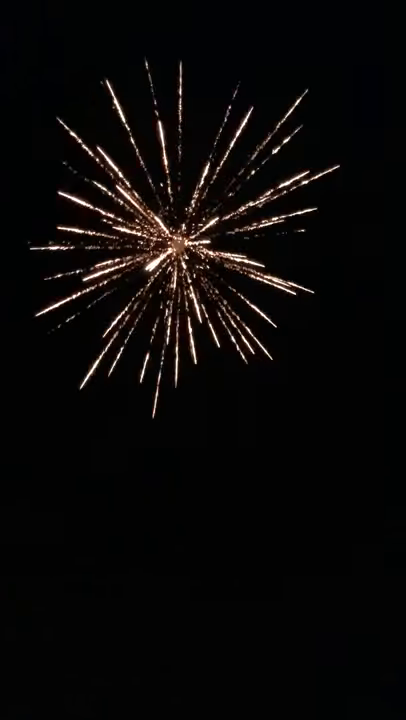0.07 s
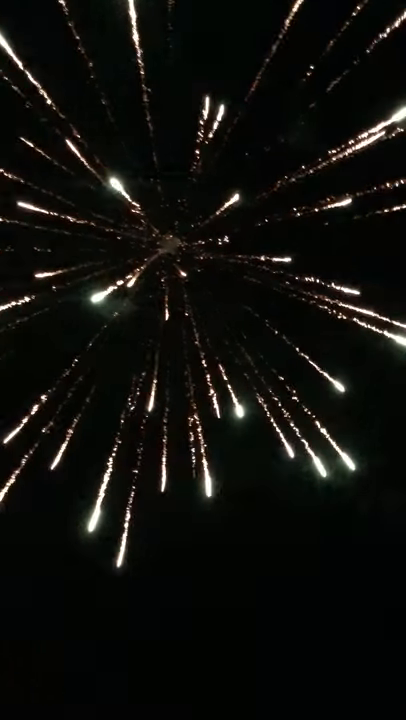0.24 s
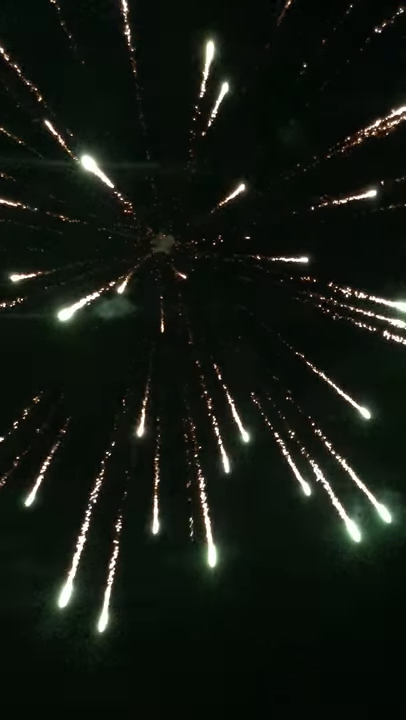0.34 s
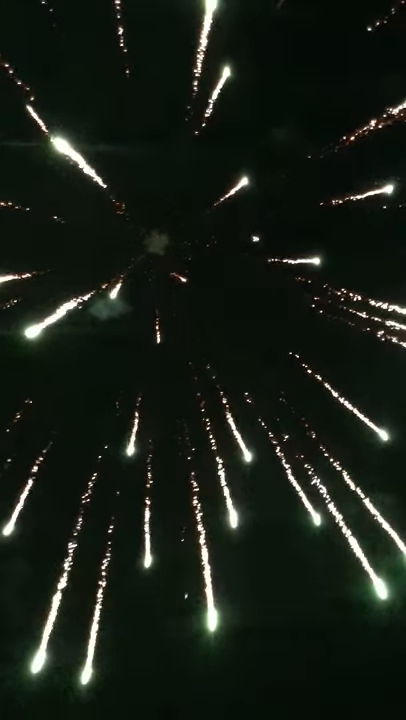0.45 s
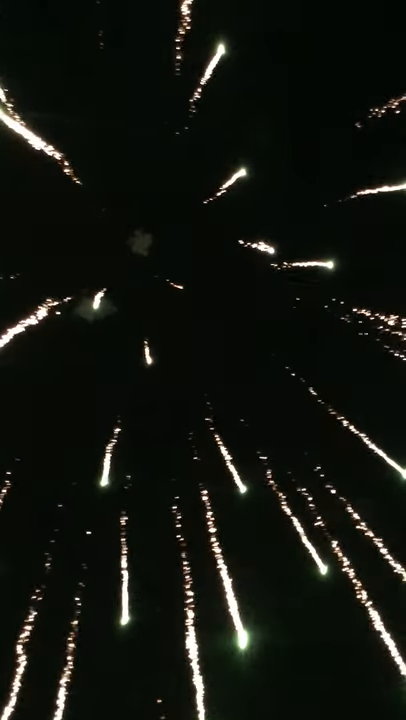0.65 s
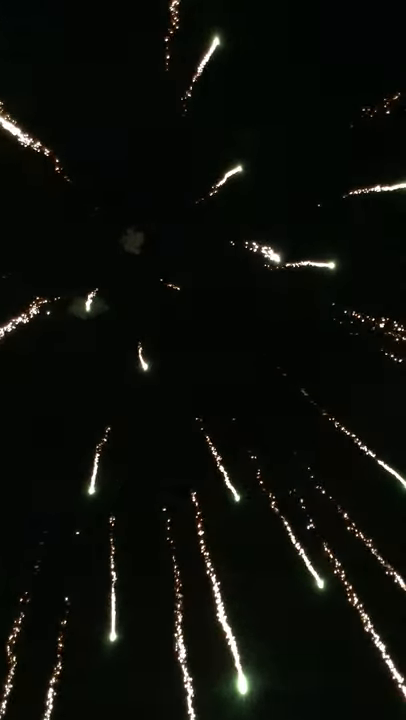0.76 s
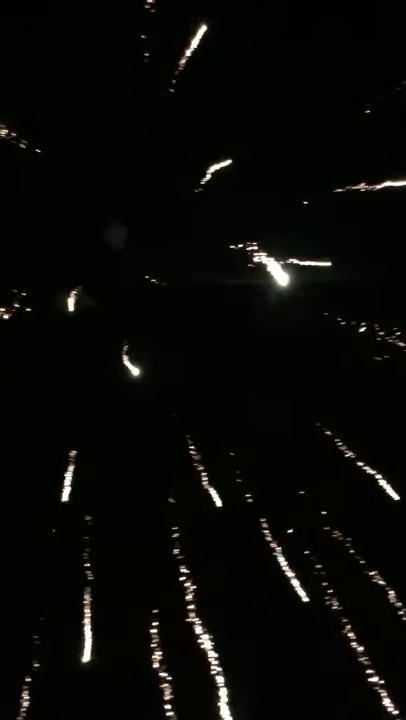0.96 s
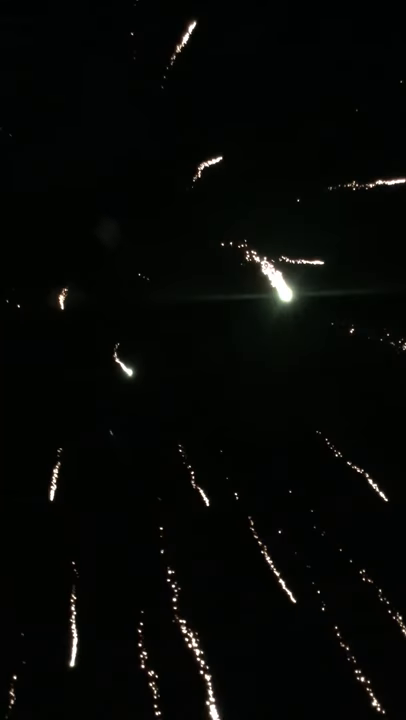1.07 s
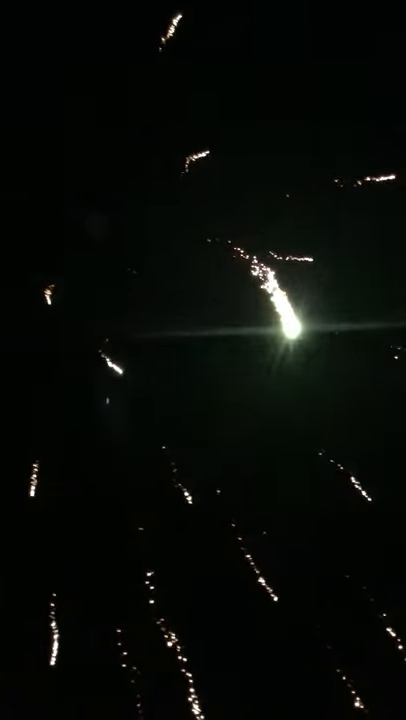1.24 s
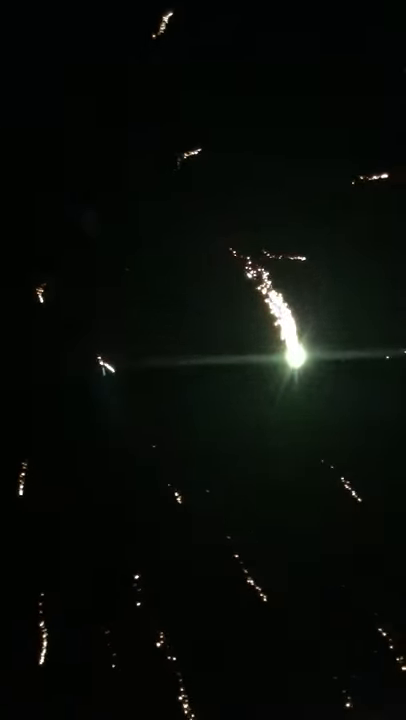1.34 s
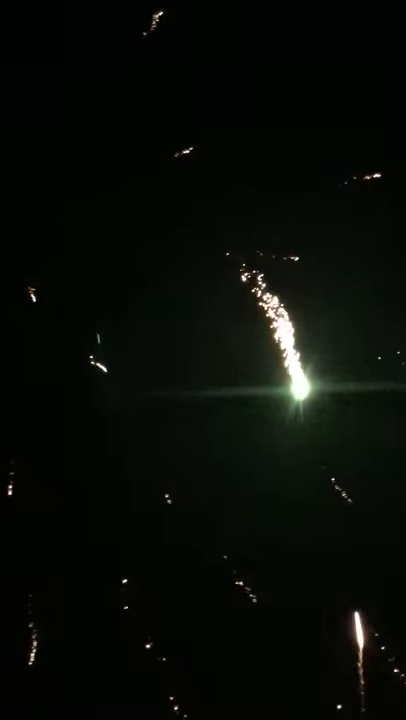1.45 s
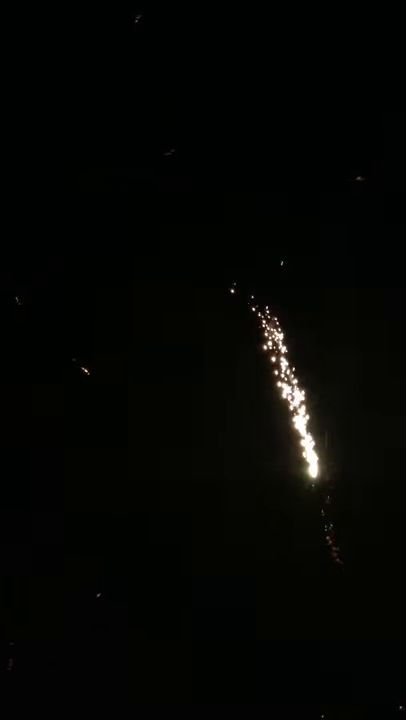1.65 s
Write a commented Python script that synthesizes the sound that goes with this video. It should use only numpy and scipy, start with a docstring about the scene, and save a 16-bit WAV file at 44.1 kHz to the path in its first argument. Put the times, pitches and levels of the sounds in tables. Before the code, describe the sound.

Quiet outdoor night hush with faint distant pops, then a close, overloading firework explosion, its rumble echoing off walls and slopes, followed by a shorter booming bang and a dry snap, heard at a single microphone.

```python
"""A firework shell bursts overhead: a shock front, a dense roar off the ground and nearby walls, then a long
rolling rumble. A second later come a booming report and a thin, sharp crack, each with its own slap echoes.
Faint pops sound far away in a low outdoor hush, all heard at one microphone. Fronts are shaped pulses, booms
are decaying sines, roars and tails are fading noise; a fast limiter holds down the loudest peaks."""
import sys
import numpy as np
from scipy import signal
from scipy.fft import rfft, irfft, next_fast_len
from scipy.io import wavfile
from scipy.ndimage import uniform_filter1d, minimum_filter1d, map_coordinates

SR = 44100
rng = np.random.default_rng(int(sys.argv[2]) if len(sys.argv) > 2 else 0)


def to_wav(s):
    """Save 16-bit WAV."""
    ch = np.atleast_2d(s).T  # columns
    pcm = np.round(np.clip(ch, -1, 1) * 32767)  # PCM
    wavfile.write(sys.argv[1], SR, pcm.astype(np.int16))


N = 74970  # samples

# Levels are dB re full scale ahead of the limiter; colours give only the shape of a spectrum.
# Spectrum of the outdoor hush [pitch_hz, relative_level_db]
NIGHT_COLOUR = [(25, -28), (70, -6), (120, 2.5), (260, -0.5), (400, -8), (700, -11), (1000, -23),
                (2700, -30), (5000, -39), (15500, -48)]
NIGHT_DB = -51.5  # rms about which the hush wavers
# Far pops [start_s, peak_db, pitch_hz, half_width_octaves]
FAR_POPS = [(.079, -37.5, 245, 0.38), (0.164, -47, 2500, 0.87)]

BURST_S = 0.2162  # the shell's shock front reaches the microphone
# The shell's shock and its near reflections [delay_s, peak_db]
BURST_SHOCKS = [(0, 2), (.0012, -25), (.0042, 1), (.015, -3), (.031, -2), (0.0337, 3.5)]
# Spectrum of the shock and its tearing edge [pitch_hz, relative_level_db]
BURST_COLOUR = [(40, -1.5), (300, 1), (1400, -4), (2500, -18.5), (6000, -18.5), (9000, -24), (15500, -22.5)]
# The shell's low push, before its attack [pitch_hz, start_level_db, t60_s]
BURST_BOOM = [(62, -3.5, .11), (87.9, 4.5, 0.12), (125.2, -1, .1), (243.4, -7, 0.225)]
# Spectrum of the roar off the ground and nearby walls [pitch_hz, relative_level_db]
ROAR_COLOUR = [(15, -41), (25, -12), (86, 0.5), (188, -3.5), (253, -0.5), (495, -3.5), (567, -9),
               (762, -13), (1710, -21), (1900, -17.5), (3630, -25), (5430, -27.5), (15500, -47)]
# Decay of the roar [pitch_hz, t60_s]
ROAR_T60 = [(110, 0.098), (300, 0.39), (1000, 0.25), (4000, 0.25), (12000, 0.28)]
# Dull single echoes of the shell [delay_s, peak_db]
THUDS = [(0.061, -2.5), (0.07, -6.5), (.126, -7.5), (.137, -11)]
# Spectrum of those echoes [pitch_hz, relative_level_db]
THUD_COLOUR = [(30, -24), (80, -9.5), (250, 8), (400, -4.5), (800, -18), (3000, -49), (15000, -80)]

# Spectrum of the long rumble [pitch_hz, relative_level_db]
ROLL_COLOUR = [(15, -53), (25, -69), (64, -7), (164, -4), (221, -2.5), (260, -1.5), (368, -5.5), (445, -6),
               (848, -16.5), (1490, -19), (1660, -20), (2300, -20.5), (4260, -27.5), (15500, -62.5)]
# Decay of the rumble, shared by the report's roll [pitch_hz, t60_s]
ROLL_T60 = [(60, 5.3), (140, 3.4), (300, 5.04), (1500, 3.36), (4000, 2.35), (8000, 1.49), (14000, 0.77)]
# Swells of the rumble, returned by far slopes and buildings [delay_s, width_s, gain_db]
SWELLS = [(.19, 0.041, 2), (.3, 0.063, 1), (.56, 0.082, 2)]
CRACKLE_RATE, CRACKLE_DB = 900, 0.44  # graininess of the tails: random knots per second, depth in dB

# Ragged echoes off walls, trees and slopes
# [start_s (centre), relative_level_db, pitch_hz, half_width_octaves, length_s (centre to 1/e)]
SLAPS = [(0.3387, -18.5, 4000, 0.22, 0.0051), (.377, -20, 4300, 0.12, 0.008),
         (0.629, -20.5, 75, 0.36, 0.019), (0.79, -18, 350, .8, 0.016), (1.285, -10, 250, 0.68, 0.0038),
         (1.316, -7.5, 300, 0.78, 0.0058), (1.314, -27, 2200, 1.1, .004), (1.36, -16.5, 1350, 0.96, 0.0062),
         (1.464, -24, 2800, 0.82, 0.0017), (1.553, -36, 3750, 0.29, 0.022)]
# Sharp echoes off hard walls [start_s, peak_db, pitch_hz, half_width_octaves]
TICKS = [(1.2793, -10.5, 3200, 0.51), (1.2849, -9, 4230, 0.31), (1.4152, -17, 1390, 0.65)]

REPORT_S = 1.2465  # the second, booming report
REPORT_SHOCK_DB = 0  # peak of its shock front
# Spectrum of the report's front [pitch_hz, relative_level_db]
REPORT_COLOUR = [(100, -10), (450, -1), (750, -7), (1250, 4), (1900, -4), (3000, -3), (3700, -6.5),
                 (4700, -2), (6800, -10), (8200, -27), (11000, -37), (15500, -42)]
# The report's low push, before its attack [pitch_hz, start_level_db, t60_s]
REPORT_BOOM = [(73.6, -5.5, 0.092), (187.7, 6.5, 0.057), (304, 3.5, 0.052), (474, -1, 0.033)]
# Spectrum of the report's short tail [pitch_hz, relative_level_db]
REPORT_TAIL_COLOUR = [(15, -55), (25, -29), (53, -9.5), (173, -8), (289, -2), (349, -6), (482, -9.5),
                      (945, -19), (1170, -16.5), (4380, -25.5), (15500, -56.5)]
# Decay of that tail [pitch_hz, t60_s]
REPORT_TAIL_T60 = [(60, 0.85), (300, 0.47), (1500, 0.37), (4000, 0.32), (12000, 0.28)]
# Spectrum of the report's weaker roll [pitch_hz, relative_level_db]
REPORT_ROLL_COLOUR = [(25, -35), (75, -0.5), (250, -1), (500, -11.5), (1200, -12), (4000, -21), (8000, -42),
                      (15500, -70)]

# Thin cracks; the level scales every part of a crack [start_s, level_db]
CRACKS = [(1.3992, -0.5), (1.6488, -21)]
# Spectrum of a crack [pitch_hz, relative_level_db]
CRACK_COLOUR = [(60, -19.5), (200, -2.5), (750, -10), (1500, 2.5), (2000, -3), (2400, -11.5), (3100, -9),
                (3700, -22), (4400, -9), (5500, -40), (6900, -23), (8000, -41), (15500, -61)]
# A crack's direct front and near reflections [delay_s, relative_level_db]
CRACK_WALLS = [(0, 2), (.0017, -10), (.004, -9.5), (0.014, -24)]
# Spectrum of a crack's brief puff [pitch_hz, relative_level_db]
CRACK_TAIL_COLOUR = [(30, -26), (80, 3), (220, 8.5), (600, -20), (1600, -7.5), (3000, -24), (4400, -14.5),
                     (8000, -39), (15500, -65)]
# Decay of the puff [pitch_hz, t60_s]
CRACK_TAIL_T60 = [(100, 0.15), (1500, 0.12), (10000, 0.17)]
# A crack's slight low push [pitch_hz, relative_start_level_db, t60_s]
CRACK_BOOM = [(75, -19, 0.13), (198, -15, 0.084)]

CEILING, LOOKAHEAD_S = 1, 0.0012  # the recorder's limiter: top amplitude, window in seconds
TOP_HZ = 15800  # band limit of the recorder


def amp(db):
    """Decibels to gain."""
    return 10 ** (np.asarray(db) / 20)


def along(points, hz):
    """Read (pitch_hz, value) points on a log frequency axis."""
    point_hz, values = np.transpose(points)
    return np.interp(np.log(hz + 1), np.log(point_hz + 1), values)


def since(start):
    """Seconds since start, zero before it."""
    return np.maximum(np.arange(N) / SR - start, 0)


def wobble(rate):
    """A smooth random curve through rate knots a second."""
    knots = rng.standard_normal(N // 20)
    return map_coordinates(knots, [np.arange(N) * rate / SR], mode="wrap")


def filtered(x, response):
    """Multiply the spectrum of x by a response of frequency."""
    size = next_fast_len(N + SR // 2)
    spectrum = rfft(x, size) * response(np.fft.rfftfreq(size, 1 / SR))
    return irfft(spectrum, size)[:N]


def noise(colour):
    """Coloured noise of rms 1."""
    x = filtered(rng.standard_normal(N), lambda hz: amp(along(colour, hz)))
    return x / x.std()


def band(pitch, half_width):
    """A colour with one rounded hump, 6 dB down at half_width octaves to either side."""
    hz = np.geomspace(20, SR / 2, 60)
    octaves = np.log2(hz / pitch)
    return np.c_[hz, -20 * np.log10(1 + (octaves / half_width) ** 4)]


def shocks(start, arrivals, colour):
    """One causal pressure pulse of the given colour for each (delay_s, peak_db)."""
    size = 8192
    cepstrum = irfft(np.log(amp(along(colour, np.fft.rfftfreq(size, 1 / SR)))))
    # Folding the cepstrum forward gives minimum phase: the energy comes as early as it can
    folded = 2 * cepstrum[:size // 2] * np.r_[0.5, np.ones(size // 2 - 1)]
    shape = irfft(np.exp(rfft(folded, size)))
    train = np.zeros(N)
    for delay, db in arrivals:
        train[min(round((start + delay) * SR), N - 1)] += amp(db)
    return signal.fftconvolve(train, shape / abs(shape).max())[:N]


def pulse(start, db, colour):
    """A single pressure pulse with no reflections."""
    return shocks(start, [(0, db)], colour)


def front(start, colour, t60_s):
    """The brief tearing noise that follows a shock front."""
    t = since(start)
    return (t > 0) * amp(-60 * t / t60_s) * noise(colour)


def boom(start, modes, attack_s):
    """A few low cycles of pressure, beginning with the suction behind the front."""
    t = since(start)
    ring = sum(amp(db - 60 * t / t60) * np.sin(2 * np.pi * hz * t) for hz, db, t60 in modes)
    return -ring * (1 - np.exp(-t / attack_s))


def scatter(start, colour, t60, attack_s, hold_s):
    """Countless merged reflections: they rise, hold, then each frequency dies at its own speed."""
    hz, t, bins = signal.stft(noise(colour), SR, nperseg=256)
    fading_s = np.maximum(t - start - hold_s, 0)
    fade = amp(-60 * fading_s / along(t60, hz)[:, None])
    faded = signal.istft(bins * fade, SR, nperseg=256)[1][:N]
    return faded * (1 - np.exp(-since(start) / attack_s))


def grainy(x):
    """The treble of a tail breaks up into single small reflections: a fast flutter of unit rms gain."""
    treble = filtered(x, lambda hz: hz ** 4 / (hz ** 4 + 1200 ** 4))
    flutter = amp(CRACKLE_DB * wobble(CRACKLE_RATE))
    flutter = flutter / np.sqrt(np.mean(flutter ** 2))
    return x + treble * (flutter - 1)


def night():
    """A low outdoor hush of wavering noise, with faint far pops as band-shaped pulses."""
    hush = amp(NIGHT_DB + 3.0 * wobble(18.8)) * noise(NIGHT_COLOUR)
    pops = sum(pulse(s, db, band(pitch, width)) for s, db, pitch, width in FAR_POPS)
    return hush + pops


def shell():
    """The main burst: shock fronts, their tearing edge, a deep push, the near roar and dull echoes."""
    shock = shocks(BURST_S, BURST_SHOCKS, BURST_COLOUR)
    tear = amp(1) * front(BURST_S, BURST_COLOUR, t60_s=0.031)
    push = boom(BURST_S, BURST_BOOM, attack_s=0.017)
    roar = amp(-7) * scatter(BURST_S, ROAR_COLOUR, ROAR_T60, attack_s=0.003, hold_s=0.033)
    thuds = shocks(BURST_S, THUDS, THUD_COLOUR)
    return shock + tear + push + grainy(roar) + thuds


def rumble():
    """The burst rolls round the landscape as slowly fading noise, swelling unevenly."""
    t = since(BURST_S)
    swell_db = sum(db * np.exp(-((t - delay) / width) ** 2) for delay, width, db in SWELLS)
    roll = scatter(BURST_S, ROLL_COLOUR, ROLL_T60, attack_s=0.027, hold_s=0.25)
    return grainy(amp(-23.5 + swell_db + 1.33 * wobble(59.42)) * roll)


def slaps():
    """Rough surfaces return a short smear in their own colour, hard walls a tick."""
    t = np.arange(N) / SR
    out = np.zeros(N)
    for s, db, pitch, width, length in SLAPS:
        swell = np.exp(-((t - s) / length) ** 2)
        out += amp(db - 11) * swell * noise(band(pitch, width))
    for s, db, pitch, width in TICKS:
        out += pulse(s, db, band(pitch, width))
    return out


def report():
    """A sharp front, a few cycles of boom, a short tail and a weaker roll."""
    snap = pulse(REPORT_S, REPORT_SHOCK_DB, REPORT_COLOUR)
    tear = amp(2) * front(REPORT_S, REPORT_COLOUR, t60_s=0.009)
    push = boom(REPORT_S, REPORT_BOOM, attack_s=0.0034)
    tail = scatter(REPORT_S, REPORT_TAIL_COLOUR, REPORT_TAIL_T60, attack_s=0.00067, hold_s=0.048)
    tail = amp(-21.5 + 2.9 * wobble(110)) * tail
    roll = amp(-34) * scatter(REPORT_S, REPORT_ROLL_COLOUR, ROLL_T60, attack_s=0.05, hold_s=0.18)
    return snap + tear + push + grainy(tail + roll)


def cracks():
    """Small charges snap: a thin pulse with near reflections, a brief puff and a slight low push."""
    out = np.zeros(N)
    for s, db in CRACKS:
        snap = shocks(s, CRACK_WALLS, CRACK_COLOUR)
        puff = amp(-19) * scatter(s, CRACK_TAIL_COLOUR, CRACK_TAIL_T60, attack_s=0.0005, hold_s=0.003)
        push = boom(s, CRACK_BOOM, attack_s=0.0055)
        out += amp(db) * (snap + puff + push)
    return out


def scene():
    """Everything, at one microphone."""
    return (night() + shell() + rumble() + slaps() + report() + cracks())[None]


def record(dry):
    """A fast limiter holds down the loudest peaks, then a steep low-pass cuts above the band limit."""
    size = max(int(LOOKAHEAD_S * SR), 1)
    needed = CEILING / np.maximum(abs(dry[0]), CEILING)
    # Centred windows: the gain starts down just ahead of each peak
    gain = uniform_filter1d(minimum_filter1d(needed, size), size)
    return filtered(dry[0] * gain, lambda hz: 1 / (1 + (hz / TOP_HZ) ** 80))[None]


dry = scene()
out = record(dry)
to_wav(out)
```